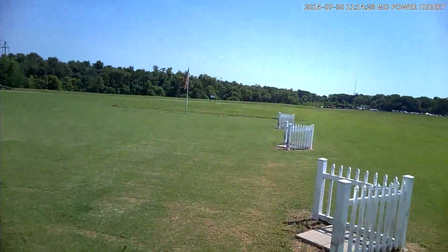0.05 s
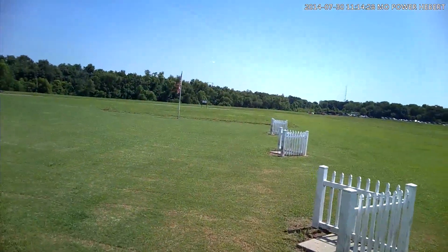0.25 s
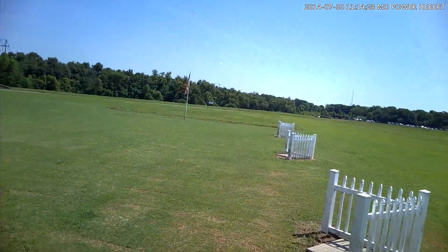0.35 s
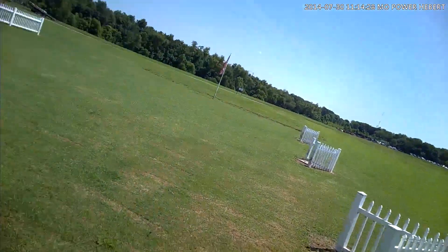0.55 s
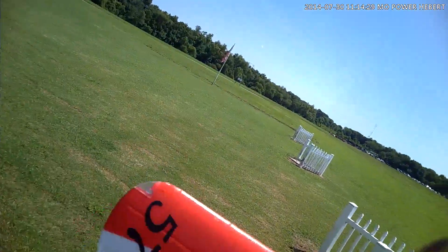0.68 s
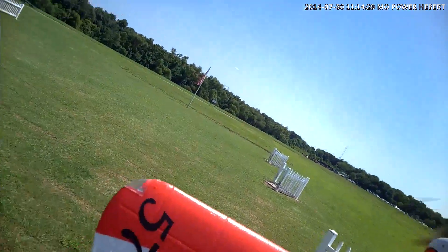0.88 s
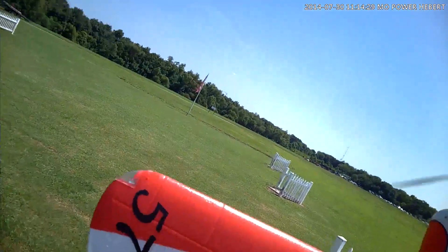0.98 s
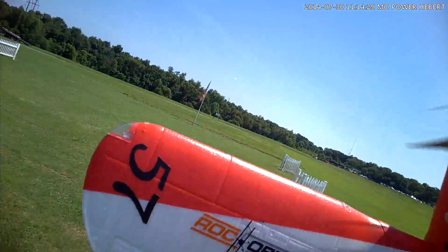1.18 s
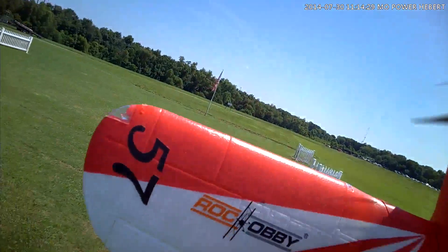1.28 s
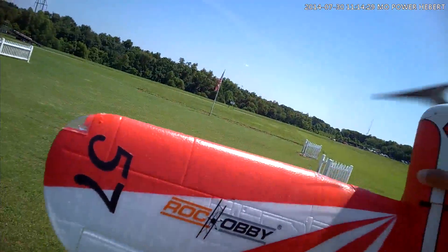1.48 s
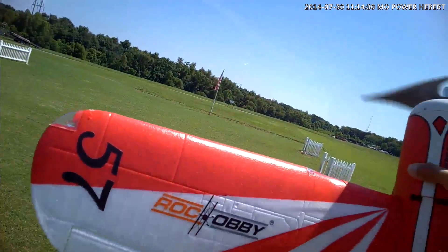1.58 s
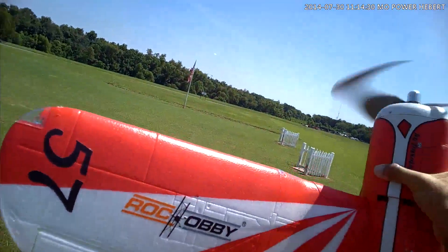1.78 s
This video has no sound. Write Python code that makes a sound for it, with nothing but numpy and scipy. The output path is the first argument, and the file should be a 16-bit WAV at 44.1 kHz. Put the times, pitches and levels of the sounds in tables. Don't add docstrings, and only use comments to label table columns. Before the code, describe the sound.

Close to a small camera microphone outdoors, a model plane propeller sweeps upward from near silence, holds a buzzing roar with metallic motor whine, then slides down in pitch and fades into faint open-air hiss.

```python
import sys
import numpy as np
from scipy import signal
from scipy.fft import rfft, irfft
from scipy.io import wavfile
from scipy.ndimage import uniform_filter1d

SR = 44100
rng = np.random.default_rng(int(sys.argv[2]) if len(sys.argv) > 2 else 0)


def inscribe(sig):
    pcm = np.round(np.clip(np.atleast_2d(sig).T, -1, 1) * 32767)
    wavfile.write(sys.argv[1], SR, pcm.astype(np.int16))


def volts_from_db(level):
    exponent = np.asarray(level, float) / 20
    return 10 ** exponent


N = 81585
T = np.arange(N) / SR

# time in seconds, blade passages in Hz.
BLADE_RATE = [(0, 63), (.045, 70), (.12, 104), (.18, 127), (.27, 171), (.345, 189), (.44, 234), (.48, 243),
              (.55, 279), (.595, 290.8), (.7, 292.8), (1.1, 292), (1.33, 290.5), (1.425, 268), (1.5, 214),
              (1.6, 156), (1.7, 112), (1.85, 77)]
# time in seconds, blade tone in dB, air rush in dB, treble lift of the rush
# in dB, motor whine in dB as the nose turns to the camera.
PROPELLER = [(0, -86, -89, 2, -4), (.07, -77, -51.5, 0, 2), (.14, -64, -50, -6, 2),
             (.24, -50, -38.5, -1, 2), (.33, -43, -37, 0.5, 1.5), (.42, -35, -32.5, 1.5, 0.5),
             (.5, -29, -33, 1.5, 3.5), (.58, -24, -31.5, 2, -3.5), (.72, -23.5, -28.5, 1.5, -3),
             (.9, -23, -28, 2, 0), (1.15, -23.5, -27, 1.5, -0.5), (1.35, -22.5, -25.5, 1, -3),
             (1.42, -26.5, -28, 1, 3), (1.5, -36.5, -32, -1, 3), (1.58, -47.5, -33.5, -2.5, 3),
             (1.65, -65.5, -42, -3.5, 0), (1.72, -67.5, -50, -5, -6), (1.85, -85, -62, 3, 0)]
# multiple of the blade rate, level in dB re the blade tone, wobble in dB.
PARTIALS = [(.5, -31, 4), (1.5, -30, 4), (2, -11, 1.5), (3, -28, 4), (4, -23, 3)]
# frequency in Hz, width in Hz, level in dB.
LOW_BODY = [(167, 380, -9), (485, 368, -2.5), (781, 340, 1.5), (1025, 130, 7), (1226, 403, 1),
            (1858, 710, 5.5), (2318, 100, 1.5)]
# frequency in Hz, width in Hz, level in dB.
HIGH_BODY = [(3854, 980, -5), (5224, 560, -8), (6473, 660, -12), (7500, 1500, -20)]
# frequency in Hz, width in Hz, level in dB.
TIP_BODY = [(9110, 1000, -10), (10870, 930, -17), (11870, 740, -20)]
# frequency in Hz, width in Hz, level in dB.
SLOW_BODY = [(775, 290, -14.5)]
# multiple of the blade rate, bell mode in Hz, width in Hz, level in dB.
DRIVEN_ORDERS = [(21, 1520, 150, -40), (21, 1800, 350, -49), (21, 2400, 400, -41), (21, 3370, 520, -39),
                 (21, 3890, 110, -45), (21, 6140, 200, -55), (10.5, 1530, 170, -40), (10.5, 1740, 120, -46),
                 (14, 3800, 180, -34), (14, 4030, 350, -40), (16, 4340, 200, -39), (42, 3490, 240, -45),
                 (42, 3930, 200, -52), (7, 450, 60, -53), (7, 620, 120, -54), (6.5, 730, 80, -51),
                 (13, 840, 100, -55), (4.5, 1020, 80, -43), (4.5, 830, 60, -43), (28, 4450, 250, -52)]
# multiple of the blade rate, bell mode in Hz,
# width in Hz, level in dB.
COASTING_ORDERS = [(21, 1720, 400, -55), (21, 2100, 300, -58), (7, 690, 160, -51), (6, 485, 70, -54)]
# time in seconds, level in dB.
RATTLE = [
    (0, -65),
    (.04, -52),
    (.1, -46.5),
    (.22, -41.5),
    (.3, -46.5),
    (.4, -50),
    (.5, -78),
]
# frequency in Hz, width in Hz, level in dB.
RATTLE_MODES = [(3990, 160, 0.5), (3340, 480, -8), (4310, 200, -7.5)]
# time in seconds, level in dB, frequency in Hz.
SWITCHING = [
    (0, -59, 7796),
    (.2, -58, 7762),
    (.35, -61, 7742),
    (.42, -75, 7735),
    (1.42, -72, 7712),
    (1.49, -54, 7726),
    (1.55, -57, 7741),
    (1.61, -65, 7760),
    (1.66, -85, 7770),
]
# multiple of the blade rate added to the clock, level in dB re the switching tone,
# fading time in seconds.
SIDEBANDS = [(7, -4, .37), (21, -7, .1), (10.5, -5, .26)]
# frequency in Hz, density in dB per Hz.
FIELD_SPECTRUM = [(20, -14), (60, -25), (250, -16), (600, -10.5), (1300, -12.5), (2500, -21), (6000, -27),
                  (15600, -32)]


def curve(table, column=1):
    rows = np.array(table, float)
    return uniform_filter1d(np.interp(T, rows[:, 0], rows[:, column]), size=400)


def unit(x):
    return x / np.sqrt(np.mean(x ** 2))


def walk(rate):
    hold = int(SR / rate)
    levels = rng.standard_normal(N + 1)[:N // hold + 1]
    slewed = uniform_filter1d(np.repeat(levels, hold), hold)
    return 0.64 * uniform_filter1d(slewed, hold)[:N]


def ring(x, modes):
    out = 0
    for k, (hz, width, db) in enumerate(modes):
        b, a = signal.iirpeak(hz, hz / width, fs=SR)
        once = signal.lfilter(b, a, x)
        out = out + (-1) ** k * volts_from_db(db) * signal.lfilter(b, a, once)
    return out


def tone(turns):
    return np.sqrt(2) * np.cos(2 * np.pi * turns)


def field():
    hz = np.fft.rfftfreq(N, 1 / SR) + 1
    rows = np.array(FIELD_SPECTRUM)
    shape = volts_from_db(np.interp(np.log(hz), np.log(rows[:, 0]), rows[:, 1]))
    hiss = unit(irfft(rfft(rng.standard_normal(N)) * shape, N))
    level_db = -51.5 + 1
    return hiss * volts_from_db(level_db + 1.0 * walk(8.5))


def controller(turns):
    clock = np.cumsum(curve(SWITCHING, column=2)) / SR
    out = tone(clock) * volts_from_db(1.0 * walk(29))
    for k, db, until_s in SIDEBANDS:
        fade = 1 / (1 + (T / until_s) ** 12)
        out = out + volts_from_db(db + 2.0 * walk(30)) * tone(clock + k * turns) * fade
    return out * volts_from_db(curve(SWITCHING))


def rattle():
    knocks_per_s, scatter_db = 980, 3
    struck = rng.random(N) < knocks_per_s / SR
    knocks = struck * volts_from_db(scatter_db * rng.standard_normal(N))
    return unit(ring(knocks, RATTLE_MODES)) * volts_from_db(curve(RATTLE) + 3 * walk(35.5))


def orders(rows, hz, turns):
    wobble_db = 3
    out = 0
    for k, mode_hz, width, db in rows:
        near = 1 / (1 + (2 * (k * hz - mode_hz) / width) ** 6)
        out = out + near * volts_from_db(db + wobble_db * walk(61.85)) * tone(k * turns)
    return out


def motor(hz, turns):
    power_off_s, power_fade_s = 1.432, .005
    driven = .5 - .5 * np.tanh((T - power_off_s) / power_fade_s)
    whine = volts_from_db(curve(PROPELLER, column=4)) * orders(DRIVEN_ORDERS, hz, turns)
    cogging = orders(COASTING_ORDERS, hz, turns)
    return driven * whine + (1 - driven) * cogging + rattle()


def slaps(turns, speed, timing, strength):
    jitter_turns, scatter_db, level_db = .08, 4.5, -9
    passes = np.arange(1, int(turns[-1]))
    moments = np.searchsorted(turns, passes + jitter_turns * timing[passes])
    impulses = np.zeros(N)
    impulses[moments] = -volts_from_db(scatter_db * strength[passes])
    return volts_from_db(level_db) * unit(ring(impulses, [(1700, 2200, 0)])) * speed ** 2


def rush(turns, hz):
    chop_depth, chop_sharpness, lag_turns = .8, 1.6, .02
    blade_scatter_db, swirl_db = 1.5, 1.3
    unchopped_db = -8.5
    tip_lift, slow_lift = 2.26, -3.3
    speed = hz / hz.max()
    gain, timing, strength = rng.standard_normal((N // 50, 3)).T
    sweep = (.5 + .5 * np.cos(2 * np.pi * (turns - lag_turns))) ** chop_sharpness
    each_pass = volts_from_db(blade_scatter_db * gain)[(turns + .5 - lag_turns).astype(int)]
    depth = chop_depth * speed
    chopped = rng.standard_normal(N) * (1 - depth + depth * sweep * each_pass)
    air = chopped + volts_from_db(unchopped_db) * rng.standard_normal(N)

    lift_db = curve(PROPELLER, column=3)
    low = ring(chopped, LOW_BODY) + ring(air, SLOW_BODY) * volts_from_db(slow_lift * lift_db)
    finest = ring(rng.standard_normal(N), [(14000, 3500, -23.5)])
    tips = ring(air, TIP_BODY) + 0.44 * finest
    high = ring(air, HIGH_BODY) * volts_from_db(lift_db) + tips * volts_from_db(tip_lift * lift_db)

    scale = 1 / np.sqrt(np.mean(low ** 2))
    swirling = low * volts_from_db(swirl_db * walk(14.98)) + high * volts_from_db(0.45 * walk(15))
    mix = scale * swirling + slaps(turns, speed, timing, strength)
    return mix * volts_from_db(curve(PROPELLER, column=2))


def blades(turns, hz):
    speed = hz / hz.max()
    stack = tone(turns) * volts_from_db(0.56 * walk(29))
    for k, db, wobble_db in PARTIALS:
        stack = stack + volts_from_db(db + wobble_db * walk(24.4)) * tone(k * turns) * speed
    return -stack * volts_from_db(curve(PROPELLER))


def scene():
    hz = curve(BLADE_RATE)
    turns = np.cumsum(hz) / SR
    near = controller(turns) + motor(hz, turns) + rush(turns, hz) + blades(turns, hz)
    return (field() + near)[None, :]


def top_cut(x):
    return signal.sosfilt(signal.butter(12, 16060, fs=SR, output="sos"), x)


def record(dry):
    low_pass = signal.ellip(10, .2, 70, 15700, fs=SR, output="sos")
    mix = signal.sosfilt(low_pass, dry)
    return top_cut(mix)


dry = scene()
out = record(dry)
inscribe(out)
```